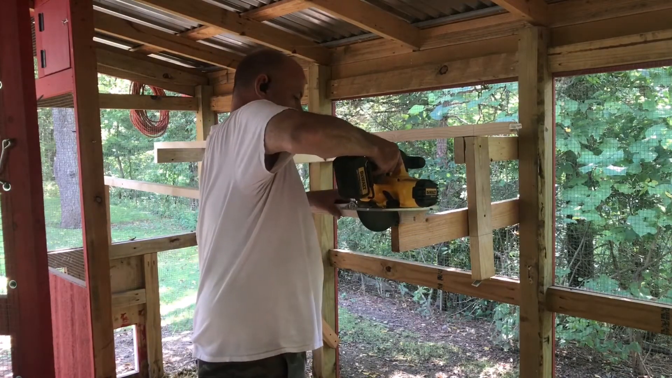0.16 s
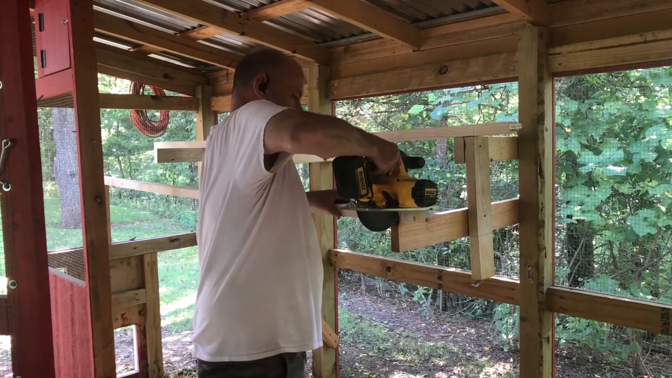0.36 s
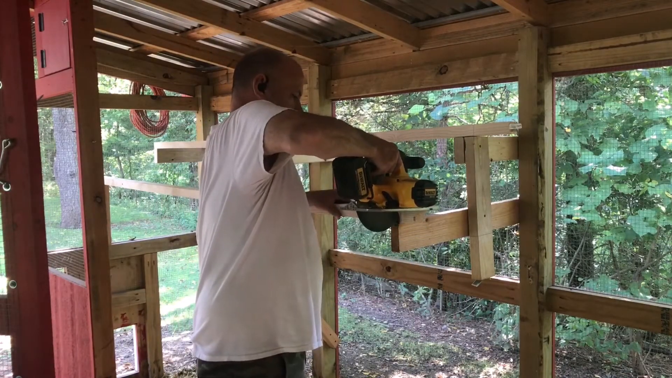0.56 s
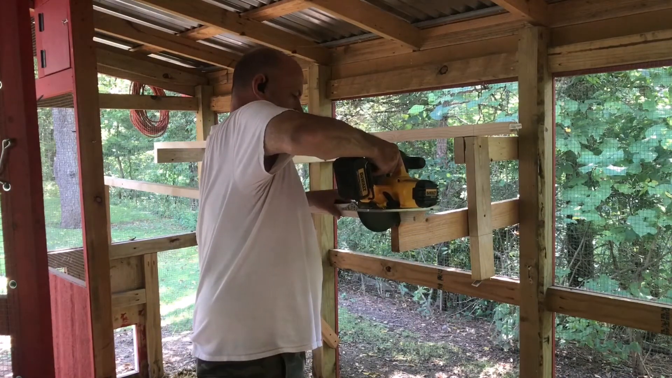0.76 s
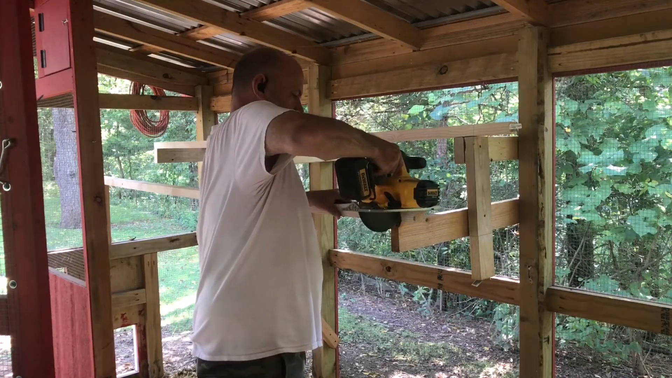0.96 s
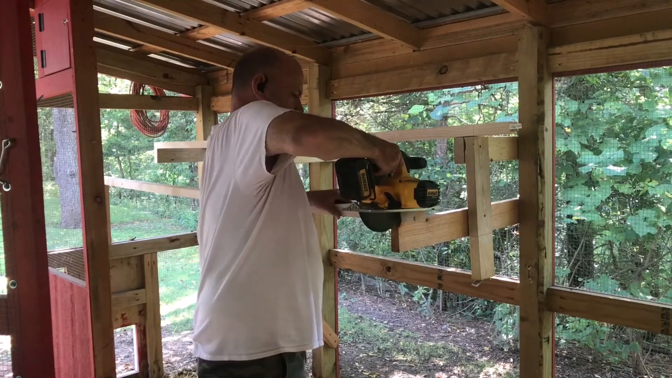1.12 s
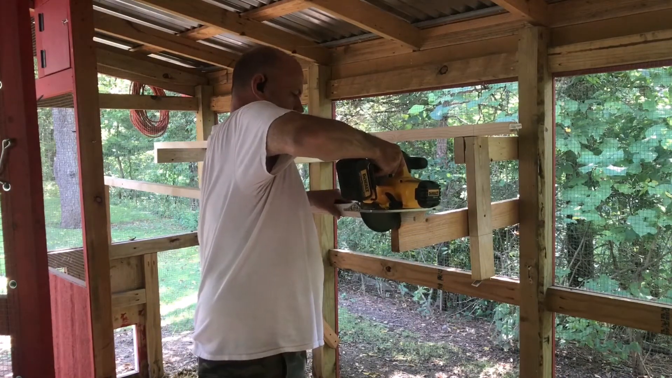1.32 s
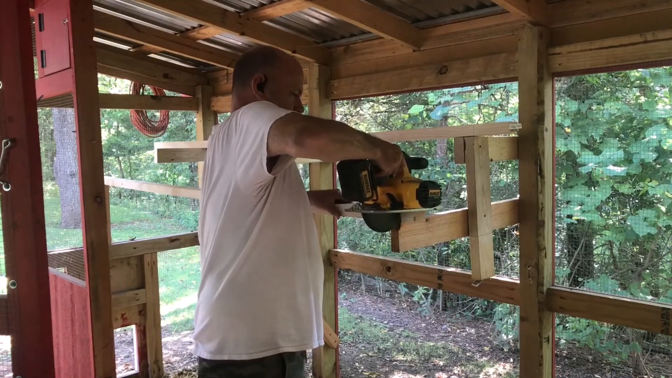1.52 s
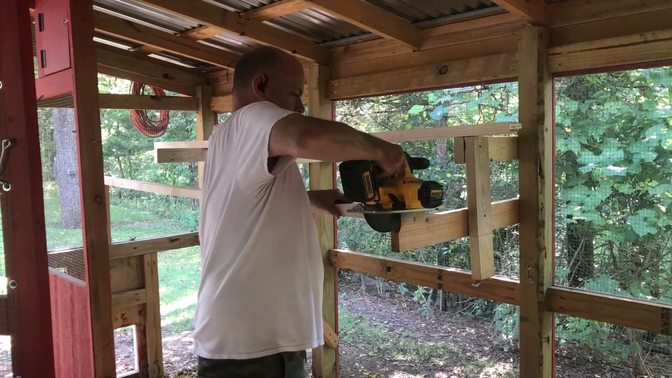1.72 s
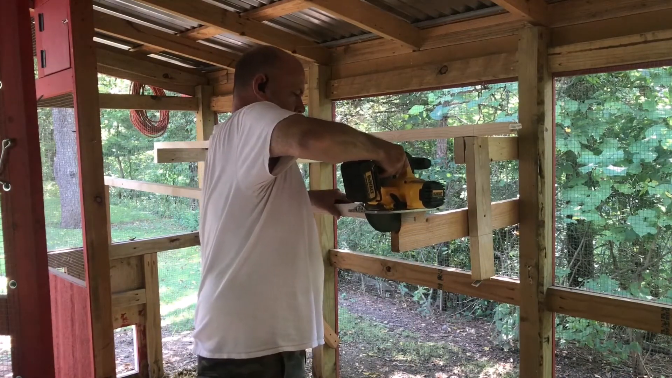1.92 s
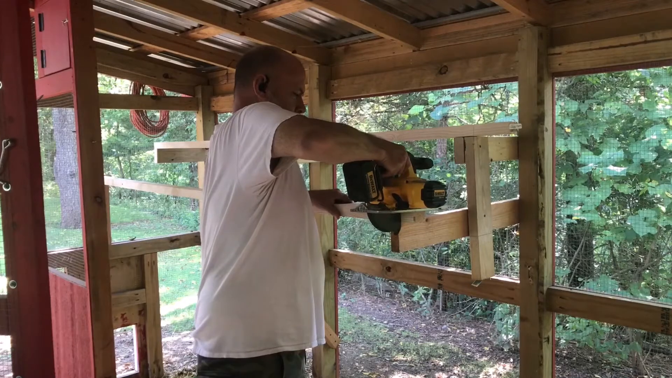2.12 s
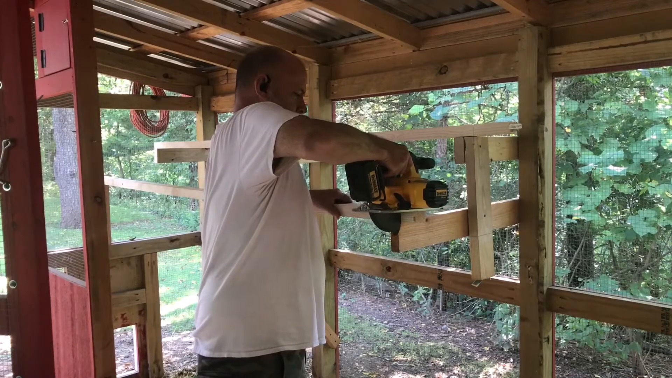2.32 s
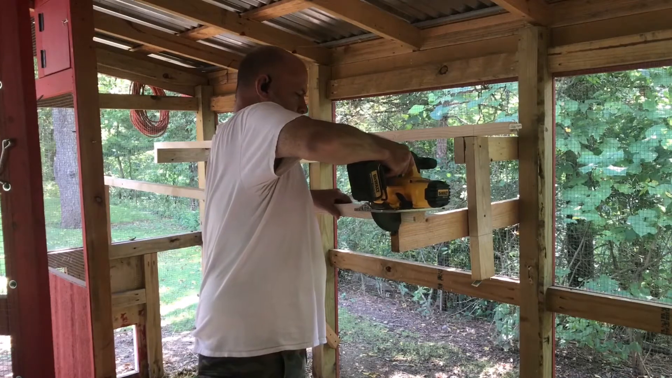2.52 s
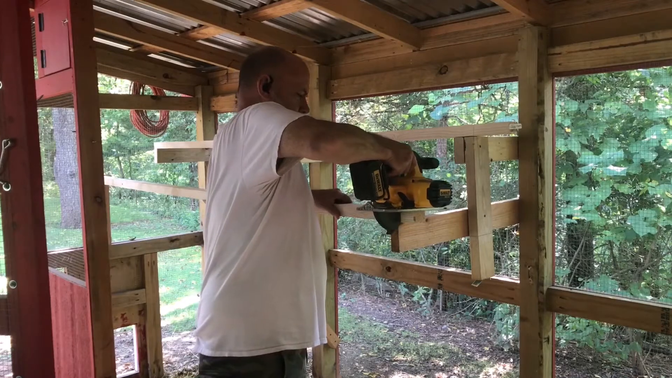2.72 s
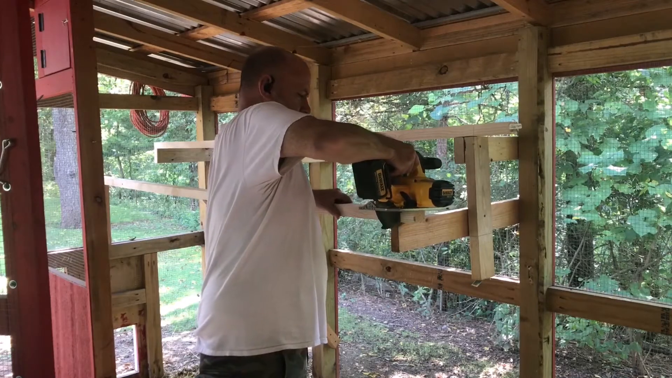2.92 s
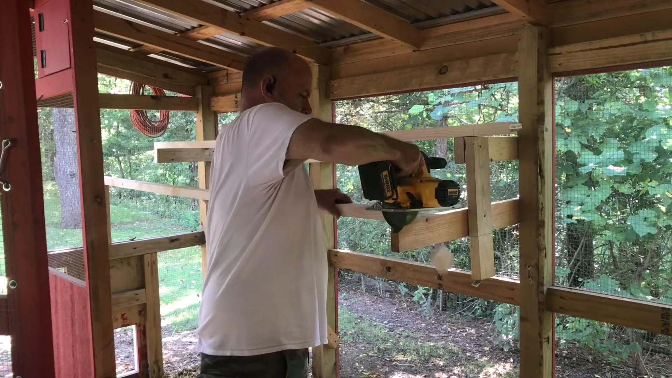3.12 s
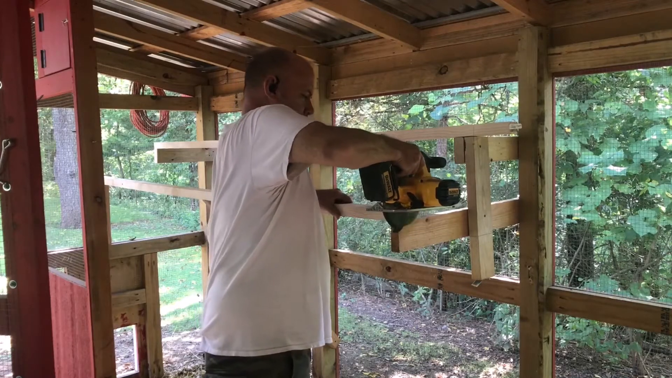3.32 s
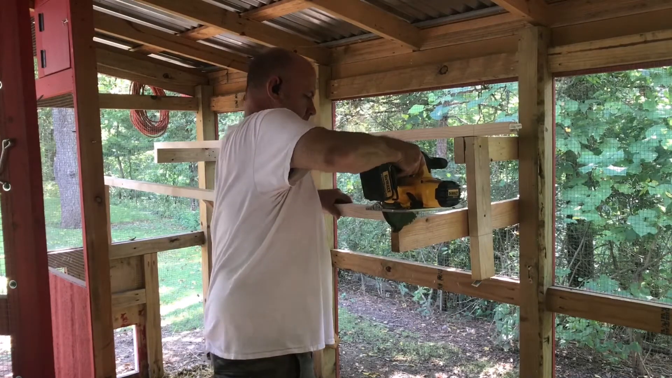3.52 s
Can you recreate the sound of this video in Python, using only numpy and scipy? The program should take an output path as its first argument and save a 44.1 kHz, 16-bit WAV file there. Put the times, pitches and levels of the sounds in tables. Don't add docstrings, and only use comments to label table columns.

```python
import sys
import numpy as np
from scipy import signal
from scipy.fft import rfft, irfft
from scipy.io import wavfile
from scipy.ndimage import uniform_filter1d, minimum_filter1d

SR = 44100
rng = np.random.default_rng(int(sys.argv[2]) if len(sys.argv) > 2 else 0)


def unload_audio(sound):
    columns = np.transpose(np.atleast_2d(sound))
    steps = np.round(np.clip(columns, -1, 1) * 32767)
    wavfile.write(sys.argv[1], SR, steps.astype(np.int16))


def nominal_scale(level):
    x = np.asarray(level, float) / 20
    return 10 ** x


N = 160965
TIME_S = np.arange(N) / SR
BRAKE_S = 3.29


def white():
    return rng.standard_normal(N)


def rms_one(x):
    return x / np.sqrt(np.mean(x ** 2) + 1e-20)


def in_time(rows, outside=None):
    s, value = np.transpose(rows)
    return np.interp(TIME_S, s, value, outside, outside)


def arch(centre_s, length_s):
    return np.cos(np.pi * np.clip((TIME_S - centre_s) / length_s, -.5, .5))


def drift(rate_hz):
    r = np.exp(-40 * np.pi * rate_hz / SR)
    noise = rng.standard_normal(N // 20 + 2002)
    slow = signal.lfilter([1], [1, -2 * r, r * r], noise)[2000:]
    return np.interp(np.arange(N) / 20, np.arange(len(slow)), rms_one(slow))


def resonate(x, hz, width_hz):
    r = np.exp(-np.pi * width_hz / SR)
    zeros = np.array([1, 0, -1]) * (1 - r * r) / 2
    poles = [1, -2 * r * np.cos(2 * np.pi * hz / SR), r * r]
    return signal.lfilter(zeros, poles, x + 1e-18)


def ringing(hz, width_hz):
    return rms_one(resonate(white(), hz, width_hz))


def colour(x, spectrum, slope_db):
    hz, db = np.array([p for p in spectrum if p[0] < 1e4]).T
    f = np.arange(len(x) // 2 + 1) * SR / len(x) + 1
    gain_db = np.interp(np.log(f), np.log(hz), db)
    gain_db += slope_db * np.clip(f - hz[-1], 0, None) / 1000
    return rms_one(irfft(rfft(x) * nominal_scale(gain_db), len(x)))


def patchy(x, patch_db):
    out, shared = 0, drift(9.0)
    edges_hz = 22 * 2 ** np.arange(0, 10, .5)
    f, spec = np.arange(N // 2 + 1) * SR / N, rfft(x)
    for low, high in zip(edges_hz, edges_hz[1:]):
        band = irfft(spec * ((f >= low) & (f < high)), N)
        out = out + band * nominal_scale(patch_db * (0.72 * shared + drift(7.0)))
    return rms_one(out)


def shed(x):
    t60_s, tail_db = .14, -2.0
    t = np.arange(int(t60_s * SR)) / SR
    tail = rng.standard_normal(len(t)) * nominal_scale(-60 * t / t60_s) * (t > .003)
    tail = tail / np.sqrt(np.sum(tail ** 2))
    return (x + nominal_scale(tail_db) * signal.fftconvolve(x, tail)[:N]) / np.hypot(1, nominal_scale(tail_db))


def outdoors():
    # freq_hz, level_db
    floor_spectrum = [(20, -17), (60, -18), (140, -12.5), (250, -27), (2600, -42.5), (3300, -31),
                      (6000, -28), (9000, -37)]
    wind = signal.sosfilt(signal.butter(2, 45.4, fs=SR, output="sos"), white())
    return nominal_scale(-50) * colour(white(), floor_spectrum, -25.0) + nominal_scale(-49.5 + 4.3 * drift(5.6)) * rms_one(wind)


def switch():
    # start_s, peak_db, hold_s, t60_s, attack_s
    clicks = [
        (0.1148, -18, 0.0013, 0.08, .0003),
        (0.167, -39, .004, .1, .001),
        (3.4903, -20.5, 0.022, 0.13, .0004),
        (3.572, -33, 0.024, 0.095, 0.007),
    ]
    # freq_hz, level_db, width_hz
    press_modes = [(1590, 6, 420), (2470, -6, 310), (4330, -1, 560), (5160, 0.5, 450)]
    # freq_hz, level_db, width_hz
    release_modes = [(1040, 5, 730), (2250, 7, 670), (3940, 1, 600), (5100, -1, 500)]
    out = np.zeros(N)
    for s, db, hold, t60, attack in clicks:
        crack_db = 6.1 * np.exp(-np.abs(TIME_S - s) / 0.0014)
        decay_db = 60 * np.clip(TIME_S - s - hold, 0, 1) / t60
        shape = np.clip((TIME_S - s) / attack, 0, 1) * nominal_scale(db - decay_db + crack_db)
        noise = white()
        broad = signal.sosfilt(signal.butter(2, [1000, 6500], "band", fs=SR, output="sos"), noise)
        rows = release_modes if s > BRAKE_S else press_modes
        modes = sum(nominal_scale(d) * rms_one(resonate(noise, f, w)) for f, d, w in rows)
        out += shape * 0.35 * (0.48 * rms_one(broad) + 1.4 * rms_one(modes))
    return out


def controller_whine():
    # freq_hz, level_db, growth_per_s
    whine_tones = [(3960, -41, 1.5), (7660, -45, 12.0)]
    start_s, end_s = .167, .48
    gate = np.clip((TIME_S - start_s) / .004, 0, 1) * np.clip((end_s - TIME_S) / 0.018, 0, 1)
    return gate * sum(nominal_scale(db) * (1 + grow * (TIME_S - start_s)) * ringing(hz, 28.0)
                      for hz, db, grow in whine_tones)


def offcut():
    # freq_hz, level_db
    offcut_modes = [(617, 5), (692, 7.5), (880, 6.5), (950, 9.5), (1280, 10), (1450, 14), (1640, 11.5),
                    (1890, 8), (2550, 12.5)]
    swell = arch(3.134, .031) ** .7
    knock = sum(nominal_scale(db) * np.sin(2 * np.pi * (hz * TIME_S + rng.random())) for hz, db in offcut_modes)
    board_s = 3.14
    after = np.clip((TIME_S - board_s) / 0.0063, 0, 1) * nominal_scale(-8.0 * (TIME_S - board_s))
    shudder = ringing(80.4, 26.0) + 0.63 * ringing(145, 124.0)
    return nominal_scale(-11.5) * swell * rms_one(knock) + nominal_scale(-38) * after * shudder


def board_shake(turns):
    # multiple, level_db
    blade_orders = [(1, 2.5), (2, -2.5), (3, -3), (4, -6.5), (6, -2), (7, -17.5), (8, -3), (9, -3)]
    # time_s, level_db
    wobble_level = [(0.76, -47), (0.85, -47), (1.51, -40.5), (1.71, -43), (2.15, -40.5), (2.18, -50),
                    (2.36, -44), (3.08, -42), (3.13, -55)]
    gear_ratio = 5.08
    orders = sum(nominal_scale(db + 2.0 * drift(4.8)) * np.sin(k * turns / gear_ratio) for k, db in blade_orders)
    return orders * nominal_scale(in_time(wobble_level, -120))


def brake_skid(turns):
    return nominal_scale(-9) * arch(3.43, .07) * np.sin(57 * turns + 2.8 * drift(350.0))


def guard_plate():
    return nominal_scale(-32 + 2.0 * drift(1.3)) * ringing(803.6, 11)


def slow_growl(grit, hz):
    growl = resonate(resonate(grit, 770, 2100.0), 770, 2100.0)
    return nominal_scale(-1.5) * np.clip(1 - hz / 400, 0, 1) ** 2 * rms_one(growl)


def tooth_squeal(grit, bite):
    squeal = resonate(resonate(grit, 5900, 1980.0), 5900, 2100.0)
    return nominal_scale(-6.5) * bite ** 4 * rms_one(squeal)


def rim_modes(bite):
    # freq_hz, level_db, start_s, end_s
    rim_table = [(1367.4, -40.5, 1.1, 3.3), (1660, -37, 2.72, 3.08), (2607, -41, 1.56, 2.2),
                 (2710, -41.5, 2.2, 3.8), (2985, -31, 1.1, 1.1), (3045, -36, 1.8, 2.9),
                 (3394, -37.5, 1.9, 2.96), (5016, -42.5, 1.18, 1.85), (5130, -40, 1.2, 2.01),
                 (5430, -37, 1.12, 1.8), (5740, -39, 1.3, 1.77), (6190, -41, 1.15, 2.0),
                 (6760, -37.5, 2.12, 2), (8170, -41, 0.25, 2.4)]
    fade_s, rest = 0.054, 0.29
    out = 0
    for hz, db, start, end in rim_table:
        gate = in_time([(start - fade_s, rest), (start, 1), (end, 1), (end + fade_s, rest)])
        out = out + nominal_scale(db + 2.5 * drift(8.8)) * gate * ringing(hz, 16.7)
    return nominal_scale(-13) * rms_one(out) * np.sqrt(bite + 0.08)


def blade_ring(bright):
    # freq_hz, width_hz, level_db
    blade_modes = [(1360, 110, -12.5), (2390, 220, 4.5), (3070, 79, -6), (3466, 82, -11.5), (3920, 52, -13),
                   (3620, 29, -16.5), (5070, 90, -5), (5414, 160, 2), (5770, 90, -2.5), (6410, 210, 3.5),
                   (6930, 230, 6), (7520, 46, -10), (8034, 66, -1.5), (8700, 370, -6)]
    ring = sum(nominal_scale(db + 4.65 * drift(3.4)) * ringing(hz, width) for hz, width, db in blade_modes)
    return nominal_scale(-11.5) * rms_one(ring) * bright


def air_and_cut_hiss(grit, bite, bright):
    # freq_hz, level_db
    free_spectrum = [(59, -68), (100, -21), (390, -16.5), (857, -8), (926, -5), (3900, 0.5), (9800, -12.5),
                     (12700, -41), (21600, -120)]
    # freq_hz, level_db
    cut_spectrum = [(59, -52), (100, -47), (455, -18), (501, -22.5), (809, -17.5), (5620, -6), (9800, -12),
                    (12700, -38), (21600, -120)]
    air = colour(white(), free_spectrum, -2)
    dull = signal.filtfilt(*signal.butter(1, 2200, fs=SR), air)
    free = nominal_scale(-5) * (1 - bite) * (dull + bright * (air - dull))
    hiss = free + nominal_scale(-2) * bite * colour(grit, cut_spectrum, -1.19)
    return patchy(hiss, 1.5) * np.sqrt(uniform_filter1d(hiss ** 2, size=4000))


def motor_orders(hz, turns, bite, braking):
    # multiple, level_db (re the saw), wobble_share
    order_table = [(1, -36, .005), (10, -17, .0008), (13, -20, .001), (18, -21, .0014), (20, -18, .0015)]
    # time_s, level_db
    pull = [(.2, 2), (.45, 1), (.6, 2), (1.4, 3), (1.9, -1), (2.4, 0), (3.0, -1), (3.12, -7), (3.28, -7),
            (3.31, 2), (3.45, 1)]
    # freq_hz, width_hz, level_db
    housing_modes = [(400, 150, 0.5), (1450, 400, 3), (2350, 900, 5), (3950, 500, 2), (5300, 800, 3.5),
                     (6700, 800, 3), (8180, 300, -3)]
    pull_db = in_time(pull)
    unrest = np.sqrt(np.abs(np.gradient(np.log(hz))) * SR) * (1 + braking)
    surge = .0015 * unrest
    torque_db = 4.5 * np.minimum(unrest, 1.5)
    tones = 0
    for k, db, wobble in order_table:
        level_db = db + torque_db + 1.8 * drift(15.0) + 2.5 * drift(102.0)
        level_db = level_db - 1.0 * braking * abs(k - 10) + pull_db * (k > 1)
        level_db = level_db - 8.9 * (k == 18) * (TIME_S < 2)
        sidebands = 1 + 0.35 * np.sin(turns * (k > 1))
        jitter = 2 * np.pi * np.cumsum((wobble + surge) * hz * drift(65.3)) / SR
        tones = tones + nominal_scale(level_db) * sidebands * np.sin(k * (turns + jitter))
    housing = 0.1 * tones
    for f, width, db in housing_modes:
        housing = housing + nominal_scale(db) * resonate(resonate(tones, f, width), f, width)
    return shed(housing) * (1 - .8 * bite)


def saw():
    # time_s, speed_hz
    motor_speed = [(.18, 30), (.255, 126.5), (.315, 203), (.38, 263.3), (.47, 332), (.54, 381), (.66, 403),
                   (.85, 410), (1.45, 403.2), (1.8, 386), (2.15, 368.8), (2.4, 362.4), (3.0, 385),
                   (3.29, 400), (3.34, 255), (3.41, 150), (3.47, 70)]
    # time_s, level_db
    effort = [(0.16, -46), (0.21, -29), (0.26, -20), (0.3, -22), (0.33, -16.5), (0.86, -19), (0.97, -16.5),
              (1.34, -15.5), (1.51, -11), (1.65, -14), (1.95, -14.5), (1.98, -13.5), (2.18, -14.5),
              (3.08, -16), (3.34, -19.5), (3.48, -36)]
    # time_s, share (0-1)
    tooth_bite = [(.75, 0), (.95, 0.43), (1.18, 0.5), (1.35, 0.46), (1.52, 0.83), (1.72, 0.36), (2.05, 0.6),
                  (2.3, 0.41), (3.05, 0.21), (3.14, 0.07)]
    hz = in_time(motor_speed)
    turns = 2 * np.pi * np.cumsum(hz) / SR
    bite = np.clip(in_time(tooth_bite, 0), 0, 1)
    braking = TIME_S > BRAKE_S
    grit = white() * nominal_scale(2.5 * np.minimum(rng.exponential(1, N), 4))
    full_hz = np.where(braking, 377, 95)
    bright = np.clip(hz / full_hz, 0, 1) ** 0.65
    body = air_and_cut_hiss(grit, bite, bright) + blade_ring(bright) + rim_modes(bite)
    body = body + tooth_squeal(grit, bite) + slow_growl(grit, hz) + guard_plate() + brake_skid(turns)
    body = body + motor_orders(hz, turns, bite, braking)
    even = body / np.sqrt(uniform_filter1d(body ** 2, size=9000))
    return nominal_scale(in_time(effort, -120)) * even + board_shake(turns)


def scene():
    return np.tile(outdoors() + switch() + controller_whine() + offcut() + saw(), (2, 1))


def hold_frames(x):
    # centre_s, length_s, depth (0-1), spacing_hz (least), tone_db
    holds = [(.293, .024, .75, 200, -2), (.773, .046, .97, 260, -1), (.915, .028, .65, 260, 0),
             (1.236, .03, .7, 260, 0), (1.447, .03, .75, 260, 0), (2.181, .046, .97, 200, -1),
             (2.641, .03, .88, 260, -7), (2.75, .03, .7, 260, 0), (3.133, .034, .7, 60, 2)]
    low_hz, high_hz, tone_count = 590, 9200, 15
    out, size = x.copy(), 4096
    f, i = np.arange(size // 2 + 1) * SR / size, np.arange(size) - size // 2
    for s, length, depth, spacing_hz, db in holds:
        cut = slice(int(s * SR) - size // 2, int(s * SR) + size // 2)
        window = np.cos(np.pi * np.clip(i / (length * SR), -.5, .5)) ** 2
        windowed = x[cut] * window
        power = np.abs(rfft(windowed)) ** 2
        local_peak = -minimum_filter1d(-power, int(spacing_hz * size / SR) | 1)
        peaks = power * (power >= local_peak) * (f > low_hz) * (f < high_hz)
        rank = peaks / uniform_filter1d(power, size=300) ** .1
        chosen = rank >= np.sort(rank)[-tone_count]
        phase = np.exp(2j * np.pi * rng.random(len(f)))
        tones = irfft(chosen * np.sqrt(peaks) * phase, size)
        tones *= nominal_scale(db - 2.5) * np.sqrt(np.sum(windowed ** 2) / np.sum((tones * window) ** 2))
        mix = depth * np.sin(np.pi / 2 * np.clip(1.5 * window, 0, 1))
        out[cut] = x[cut] * (1 - mix) + tones * np.sqrt(1 - (1 - mix) ** 2)
    return out


def thin_spectrum(x):
    # start_hz, level_db
    treble_steps = [(10150, -9), (11200, -7.5), (13000, -11), (14700, -6)]
    drop_db = [-99, -26, -33, -27.5, -30]
    f, t, z = signal.stft(x, SR, "cosine", 2048, 1024)
    size = np.abs(z) + 1e-12
    energy = np.sum(size[40:] ** 2, axis=0)
    steady = energy < 3 * np.roll(energy, 2)
    contrast = size / uniform_filter1d(size, size=15, axis=0)
    sharp = z * contrast ** (0.44 * (1 + f[:, None] / 6000) * steady)
    power = uniform_filter1d(size ** 2, size=31, axis=0)
    sharp_power = uniform_filter1d(np.abs(sharp) ** 2 + 1e-24, size=31, axis=0)
    z = sharp * np.sqrt(power / sharp_power)
    hz, db = np.transpose([(0, 0), *treble_steps])
    k = np.searchsorted(hz, f, "right") - 1
    z = z * nominal_scale(db[k])[:, None]
    chance = uniform_filter1d(rng.standard_normal((65, len(t))), size=2)
    chance = np.repeat(chance, 16, axis=0)[:len(f)]
    loud = np.sqrt(np.mean(np.abs(z[50:400]) ** 2, axis=0))
    near = uniform_filter1d(np.abs(z), size=25, axis=0)
    kept = near > loud * nominal_scale(np.array(drop_db)[k][:, None] + 5.0 * chance)
    return signal.istft(z * kept, SR, "cosine", 2048, 1024)[1][:N]


def band_limit(x):
    return signal.sosfilt(signal.butter(12, 16550, fs=SR, output="sos"), x)


def record(dry):
    mono = thin_spectrum(hold_frames(np.tanh(dry[0])))
    mono = signal.sosfilt(signal.cheby2(12, 70, 16400, fs=SR, output="sos"), mono)
    return band_limit(np.tile(mono, (2, 1)))


dry = scene()
out = record(dry)
unload_audio(out)
```